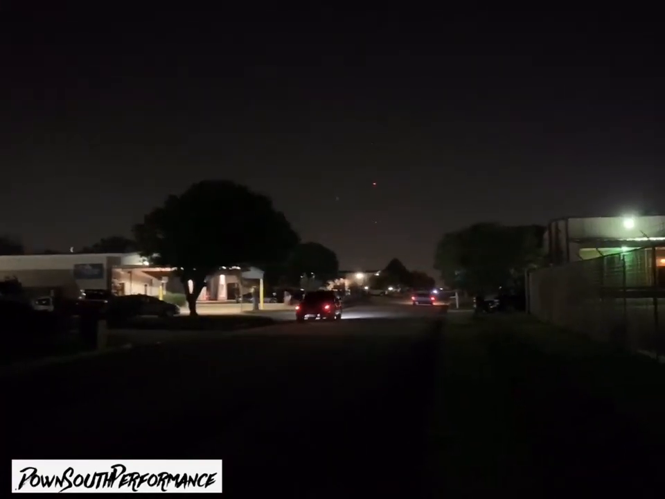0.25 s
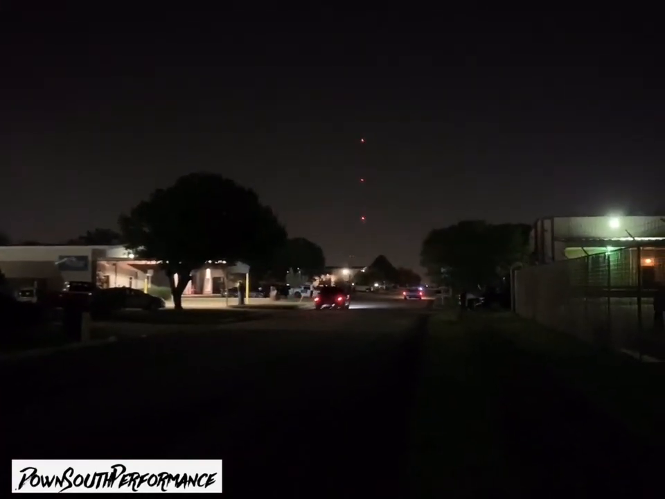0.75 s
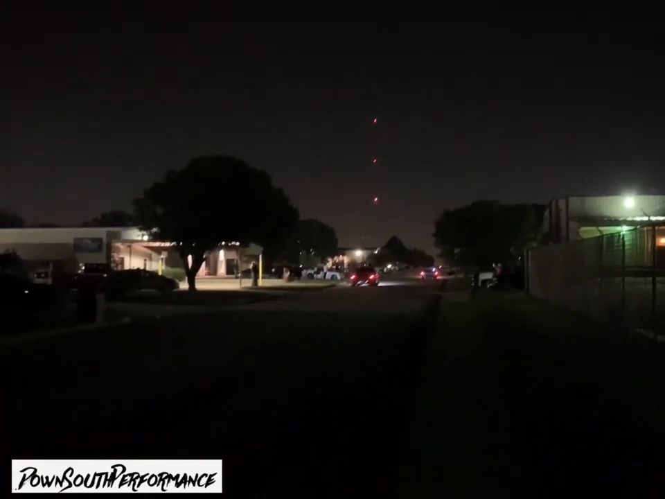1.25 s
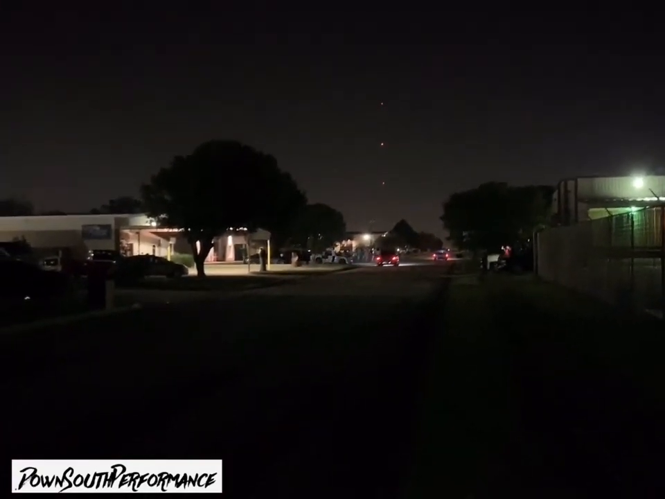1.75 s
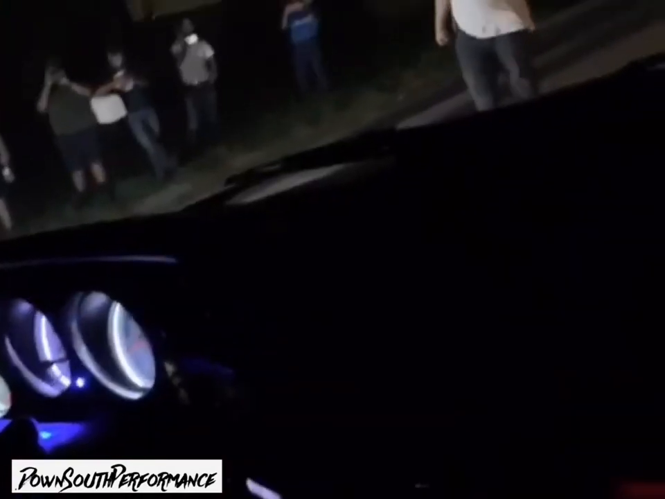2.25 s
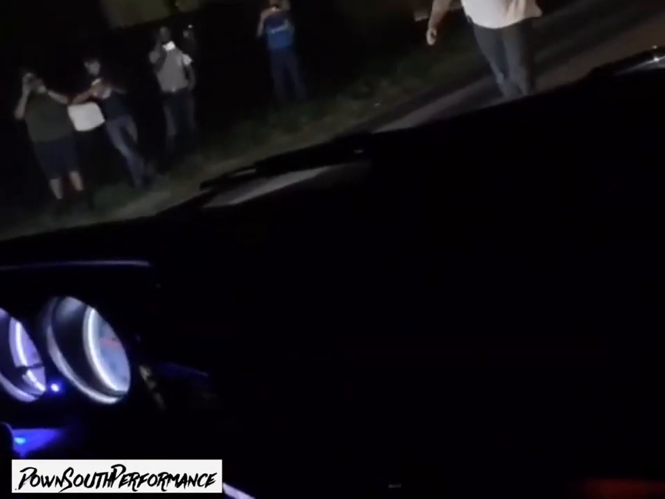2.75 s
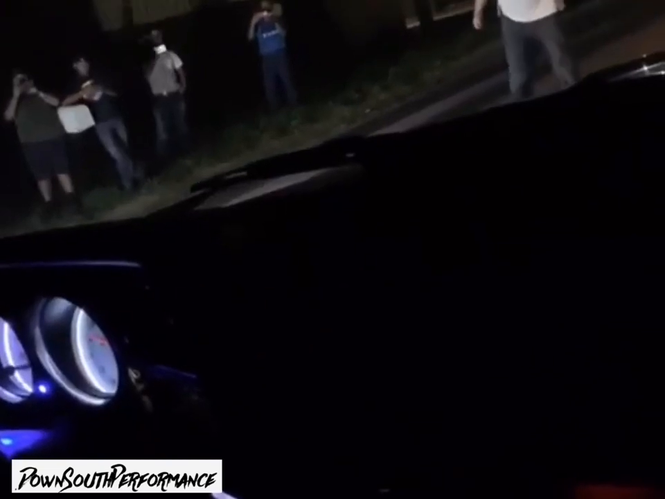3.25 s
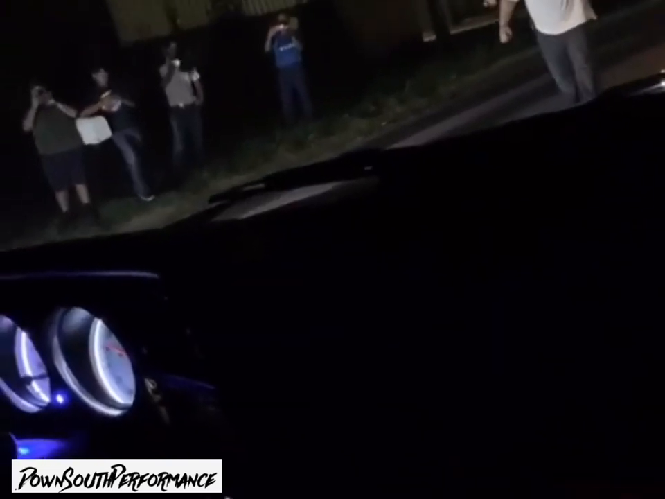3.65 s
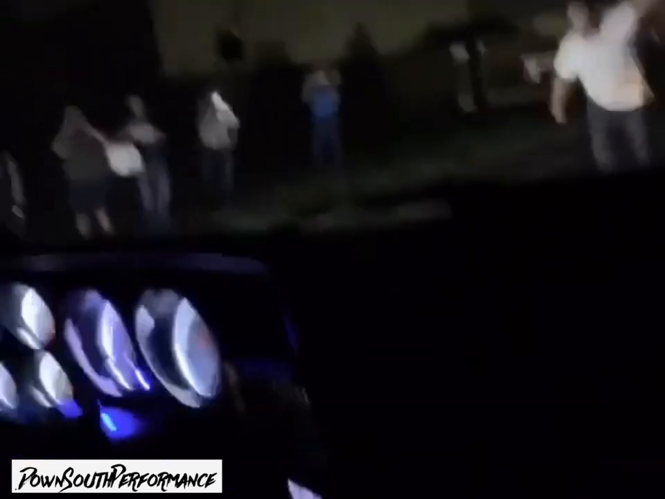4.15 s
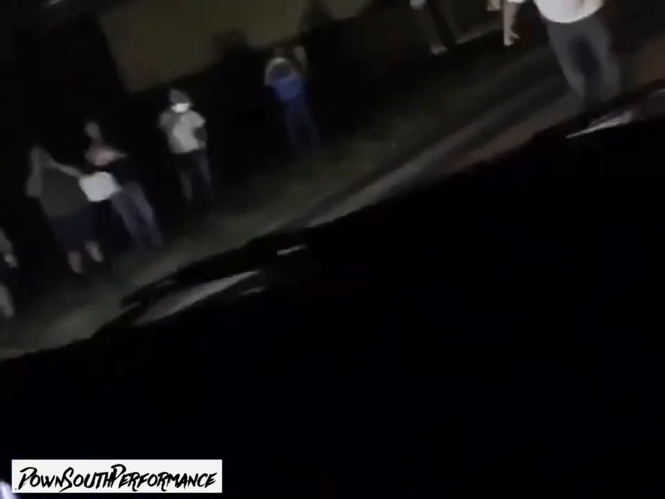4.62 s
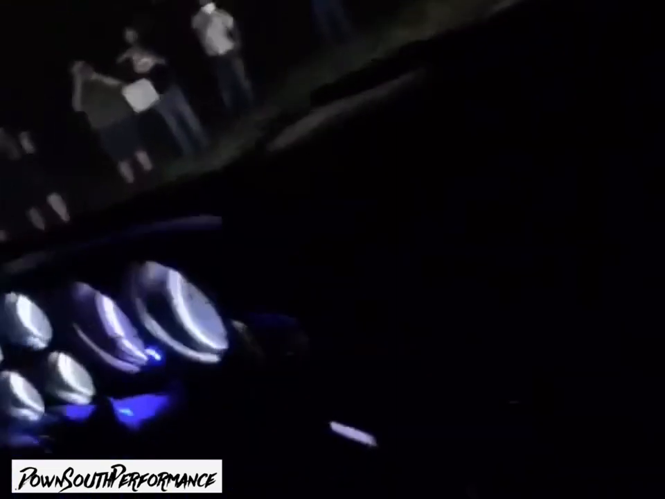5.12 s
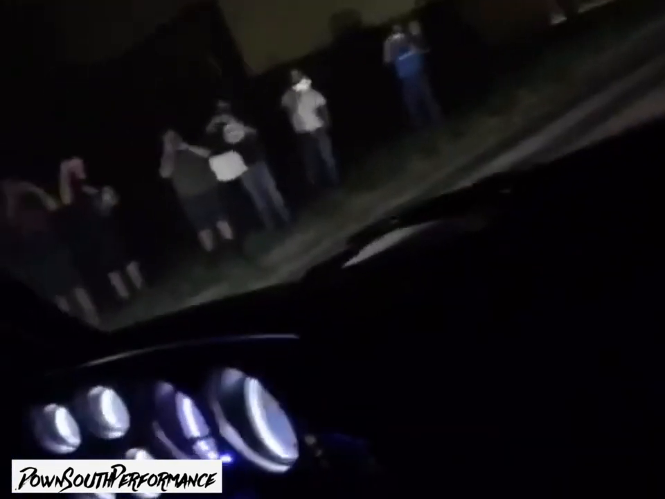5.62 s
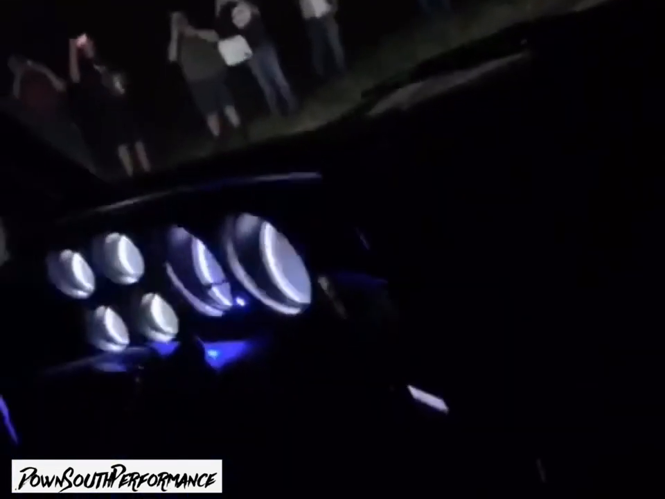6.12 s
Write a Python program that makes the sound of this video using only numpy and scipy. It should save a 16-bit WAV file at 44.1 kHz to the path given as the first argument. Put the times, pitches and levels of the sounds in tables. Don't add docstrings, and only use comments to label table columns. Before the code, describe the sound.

From 0 to 2 seconds, a night street outdoors: two racers accelerate away, slightly left of centre. A steady midrange engine note and a rival's higher one sag after a gear change at about 0.2-0.5 s, then climb slowly, growing a little louder near the end. Airy roar bounces off road and walls, with raspy gusts, low street hum and very faint high insect chirps. Near-silence for about 0.05 s, then a short falling thump at 2.03 s. Inside a cabin, a lumpy eight-cylinder engine surges upward until 2.7 s, booming and nearly overloaded, rises again to 3.2 s and holds, throbbing. It dips around 4.2 s, climbs to its highest near 4.9 s, then settles slightly lower, its roar softening until the end at 6.4 s. Valve clatter and grainy hiss ride throughout; small metallic clinks at 4.43 s and, fainter, 5.55 s.

```python
import sys
import numpy as np
from scipy import signal
from scipy.fft import rfft, irfft, next_fast_len
from scipy.io import wavfile
from scipy.ndimage import uniform_filter1d

SR = 44100
rng = np.random.default_rng(int(sys.argv[2]) if len(sys.argv) > 2 else 0)


def wav_out(sig):
    wavfile.write(sys.argv[1], SR, np.round(np.clip(np.atleast_2d(sig).T, -1, 1) * 32767).astype(np.int16))


def makeup_ratio(level_db):
    decades = np.asarray(level_db, float) / 20
    return 10 ** decades


N = 281358
TIME = np.arange(N) / SR
FAR_END_S, CUT_IN_S = 1.9815, 2.0318
PATTERN_HZ = 21.3

# [f/Hz, level/dB per Hz]
ROAR = [(290, -33), (500, -4.5), (570, -4), (690, -7.5), (766, -3.5), (850, -5), (977, -2.5), (1420, -10.5),
        (2210, -12.5), (2520, -20), (2780, -15), (3000, -24), (4000, -35.5), (5200, -50), (8800, -120)]
# [level before/dB, level after/dB]
SHIFT_DB = [
    (-38, -40.5),
    (-30, -48.5),
    (-29.5, -37),
]


def rms_one(x):
    return x / np.sqrt(np.mean(x ** 2) + 1e-20)


def in_time(rows, t):
    s, *columns = np.transpose(rows)
    return [np.interp(t, s, c) for c in columns]


def at_hz(points, hz):
    point_hz, value = np.transpose(points)
    return np.interp(np.log(hz), np.log(point_hz), value)


def lift_db(modes, hz):
    return sum(db / (1 + (2 * (hz - centre) / width) ** 2) for centre, width, db in modes)


def swept_db(modes, k, cycle_hz):
    return np.repeat(lift_db(modes, k * cycle_hz[::100]), 100)[:len(cycle_hz)]


def bouts(rows, t, fade_db_per_s, floor_db):
    levels = []
    for s, length, *_, db in rows:
        outside_s = np.maximum(np.maximum(s - t, t - s - length), 0)
        levels.append(np.maximum(db - fade_db_per_s * outside_s, floor_db))
    return np.max(levels, axis=0)


def drift(rate, size, swing_db=None):
    r = np.exp(-80 * np.pi * rate / SR)
    slow = signal.lfilter([1], [1, -2 * r, r * r], rng.standard_normal(size // 40 + 2002))
    slow = rms_one(slow[2000:])
    if swing_db is not None:
        slow = makeup_ratio(swing_db * slow)
    return np.interp(np.arange(size) / 40, np.arange(len(slow)), slow)


def coloured(spectrum, size, patchy_db, rate, channels=1):
    # [f/Hz, likeness 0-1]
    likeness = [(60, 0.98), (500, 1), (1000, 1), (2300, 1), (4700, 0.091), (9700, 0.17)]
    hz = np.maximum(np.arange(size // 2 + 1) * SR / size, 1)
    low, high = spectrum[0][0], spectrum[-1][0]
    shape = makeup_ratio(at_hz(spectrum, hz)) * (hz > low) * (hz < high)
    mid, side = rfft(rng.standard_normal((2, size))) * shape
    pair = mid[None]
    if channels == 2:
        alike = np.clip(at_hz(likeness, hz), 0, .999)
        pair = np.sqrt(1 + alike) * mid + np.sqrt(1 - alike) * side * [[1], [-1]]
    third = 3 * np.log2(hz / low)
    together = drift(rate / 3, size, .51 * patchy_db)
    out = 0
    for k in range(int(third[hz < high][-1]) + 2):
        band = irfft(pair * np.clip(1 - abs(third - k), 0, 1), size)
        out = out + band * drift(rate, size, patchy_db)
    return rms_one(together * out)


def order(cycles, k, wobble_db, wobble_rad, rate):
    size = len(cycles)
    phase = 2 * np.pi * (k * cycles + rng.random()) + wobble_rad * drift(rate, size)
    return np.sqrt(2) * drift(rate, size, wobble_db) * np.sin(phase)


def shifted_db(row, t):
    before, after = SHIFT_DB[row]
    return before + (after - before) * np.clip((t - .22) / 0.099, 0, 1)


def street_hum(t):
    # [f/Hz, level/dB per Hz]
    hum_spectrum = [(12, -55), (20, -28), (64, -6.5), (103, -11), (151, -2), (192, -2.5), (363, -7),
                    (412, -8.5), (454, -1), (549, -1.5), (614, -5.5), (698, -40.5), (900, -18.5),
                    (1170, -60), (1980, -120)]
    return makeup_ratio(shifted_db(2, t) + 0.5) * coloured(hum_spectrum, len(t), 0.91, 2.7, channels=2)


def insects(t):
    # [start/s, length/s, level/dB]
    insect_bouts = [
        (0, .05, -52),
        (.39, .01, -60),
        (.73, 0.11, -57),
        (1.05, 0.25, -54),
        (1.38, 0.027, -49),
        (1.55, .11, -53),
    ]
    song = coloured([(7200, -15.5), (8300, -4), (9500, -31.0)], len(t), 5.0, 25.0, channels=2)
    return makeup_ratio(bouts(insect_bouts, t, fade_db_per_s=90, floor_db=-62.5)) * song


def road_echo(x, t):
    dull = signal.sosfilt(signal.butter(2, 3200, fs=SR, output="sos"), x)
    late = t - 0.001913 * (1 + .035 * drift(2.5, len(t)))
    return 0.53 * np.array([np.interp(late, t, channel) for channel in dull])


def distant_roar(t):
    # [t/s, level/dB]
    roar_level = [(0.0, -28), (0.258, -30), (0.34, -35.5), (0.71, -38.5), (0.864, -35), (1.682, -34.5),
                  (1.736, -36.5), (1.93, -33), (1.98, -33.5)]
    # [f/Hz, level/dB per Hz]
    roar_spectrum = [(410, -53), (700, 2.5), (1010, -4), (1120, -6), (1420, -7), (1750, -12.5),
                     (1960, -4.5), (2240, -12.5), (2990, -12), (4180, -25), (10100, -31.5), (13100, -64),
                     (22000, -120)]
    level_db = in_time(roar_level, t)[0]
    roar = coloured(list(roar_spectrum[:-2]) + [(10900, -42)], len(t), 1.6, 5.0, channels=2)
    roar = rms_one(roar + road_echo(roar, t))
    air = coloured([(12400, 0), (15200, -4)], len(t), 1.5, 10.0, channels=2)
    return makeup_ratio(level_db) * roar + makeup_ratio(-66 + .9 * (level_db + 34)) * air


def rasp(t):
    # [start/s, length/s, centre f/Hz, level/dB]
    gusts = [
        (0.194, .04, 1570, -31),
        (0.882, .4, 1453, -37),
        (1.41, .02, 1388, -38),
        (1.598, 0.059, 1382, -34),
        (1.85, 0.083, 1470, -40.5),
    ]
    centre_hz = in_time([(s + length / 2, hz) for s, length, hz, _ in gusts], t)[0]
    level_db = bouts(gusts, t, fade_db_per_s=155, floor_db=-48)
    slow = signal.sosfilt(signal.butter(2, 110, fs=SR, output="sos"), rng.standard_normal((2, len(t))))
    phase = 2 * np.pi * np.cumsum(centre_hz) / SR
    return makeup_ratio(level_db - 0.5) * rms_one(slow[0] * np.cos(phase) + slow[1] * np.sin(phase))


def second_racer(t):
    # [t/s, f/Hz, level/dB]
    rival = [
        (0, 506, -33),
        (.2, 511, -34.5),
        (.364, 442, -36),
        (.46, 415, -38.5),
        (.56, 402, -38.5),
        (1.2, 416.5, -38),
        (1.7, 422.7, -35.5),
        (1.98, 436, -30.5),
    ]
    hz, level_db = in_time(rival, t)
    return makeup_ratio(level_db) * order(np.cumsum(hz) / SR, 1.0, 0.54, 0.083, 7.2)


def first_racer(t):
    # [t/s, speed/cycles per s]
    racer_speed = [(0, 39.1), (.22, 39.1), (.4, 38.2), (.6, 36.6), (.75, 36.75), (1.2, 37.7), (1.65, 38.6),
                   (1.98, 39.25)]
    # [order, level/dB]
    racer_pattern = [(3, 0), (4, -14.5), (5, 3), (6, -1.5), (7, -7), (12, -14), (13, -1), (14, -40),
                     (15, -22.5), (16, 4), (17, -8), (22, -15), (26, -4)]
    cycles = np.cumsum(in_time(racer_speed, t)[0]) / SR
    racer = makeup_ratio(shifted_db(1, t)) * order(cycles, 8, 1.2, .2, 8.0)
    for k, db in racer_pattern:
        racer = racer + makeup_ratio(shifted_db(0, t) - 4.0 + db) * order(cycles, k, 3.0, .4, 6.0)
    return racer


def far_street(t):
    engines = first_racer(t) + rasp(t) + second_racer(t)
    left, right = engines + street_hum(t) + distant_roar(t) + insects(t)
    return np.array([left, np.roll(right, shift=4)]) * makeup_ratio([[.3], [-.3]])


def cut_in(t):
    age = np.maximum(t - CUT_IN_S, 8e-5)
    sweep = np.cos(2 * np.pi * np.log(age / .0024) / np.log(2.4))
    thump = .8 * sweep * np.exp(-(age / .014) ** 2) * np.tanh(age / .0003)
    return signal.sosfilt(signal.cheby2(8, 60, 11500, fs=SR, output="sos"), thump)


def clink(t):
    # [t/s, level/dB]
    touches = [
        (4.431, -30),
        (4.437, -26),
        (4.445, -27.5),
        (4.452, -24.5),
        (5.55, -34.5),
    ]
    # [f/Hz, level/dB, time to fall 60 dB/s]
    ring_modes = [(2098, 2, 0.13), (2425, -4.5, 0.069), (3940, -17, 0.032), (3840, -3, 0.089),
                  (6120, -14, 0.071)]
    out = np.zeros(len(t))
    for s, hit_db in touches:
        on = (t > s) & (t < s + .2)
        age = t[on] - s
        for hz, db, t60 in ring_modes:
            level_db = hit_db + db + 1.9 * rng.standard_normal() - 60 * age / t60
            out[on] += makeup_ratio(level_db) * np.sin(2 * np.pi * hz * age)
    return out


def shaped(x, spectrum, modes):
    hz = np.maximum(np.arange(len(x) // 2 + 1) * SR / len(x), 1)
    return rms_one(irfft(rfft(x) * makeup_ratio(at_hz(spectrum, hz) + lift_db(modes, hz)), len(x)))


def clatter(cycles, change_hz):
    # [f/Hz, width/Hz, lift/dB]
    block = [(806, 24, 5), (963, 35, 5), (1059, 37, 8), (1150, 52, 7), (1365, 73, 5.5), (1590, 210, 2.5)]
    patterns = rng.standard_normal((6, 400)) * makeup_ratio(2.5 * rng.standard_normal(400))
    standing_out = makeup_ratio(4.5 * np.clip(rng.standard_normal((6, 201)), -2, 1.3))
    patterns = irfft(rfft(patterns) * standing_out, 400)
    at = (cycles * 400).astype(int)
    fresh = np.diff(at, prepend=0) > 0
    shares = np.array([drift(change_hz, len(at)) for p in patterns])
    shares = shares / np.sqrt(np.sum(shares ** 2, axis=0))
    return shaped(np.sum(shares * patterns[:, at % 400], axis=0) * fresh, ROAR, block)


def swells(t, cycles):
    # [order, start/s, end/s, level/dB]
    caught_orders = [(19, 2.6, 2.95, -21), (37, 3.15, 4.05, -38), (45, 3.0, 4.05, -36),
                     (54, 3.2, 4.05, -40), (88, 3.15, 3.65, -44), (102, 3.05, 3.85, -42),
                     (132.5, 3.1, 3.9, -48), (14, 4.45, 5.25, -23), (7, 4.55, 5.15, -24),
                     (22, 4.65, 5.15, -35), (44, 4.55, 5.25, -39), (53, 4.65, 5.2, -38),
                     (5, 5.05, 6.6, -25), (19, 2.98, 3.7, -25), (5, 4.5, 5.15, -23), (3, 2.7, 3.2, -27),
                     (52, 2.7, 3.2, -35), (58, 4.45, 5.1, -41), (63, 4.45, 5.1, -42), (24, 5.05, 6.6, -35),
                     (40, 5.15, 6.6, -43), (61, 5.1, 5.7, -43), (72, 5.2, 5.8, -44), (47, 5.15, 6.0, -42),
                     (55, 5.2, 6.0, -43), (14, 5.3, 6.6, -33)]
    out = np.zeros(len(t))
    for k, start, end, db in caught_orders:
        on = (t > start) & (t < end)
        window = np.clip(np.minimum(t[on] - start, end - t[on]) / .12, 0, 1)
        out[on] += makeup_ratio(db) * window * order(cycles[on], k, 1.0, 0.25, 5.3)
    return out


def strong_orders(t, cycle_hz, load_db):
    # [order, level at mean load off resonance/dB, share of the load's swing]
    strongest = [
        (8, -28.5, 0.089),
        (6, -23.5, .4),
        (16, -32.5, 0.45),
        (2, -30, 0.22),
    ]
    # [f/Hz, width/Hz, lift/dB]
    boom_modes = [(38, 9.6, 13.5), (125.5, 20.8, 12.5), (183.7, 9, 12.5), (345.6, 17.7, 13.5)]
    own = {}
    for k, db, share in strongest:
        own[round(k)] = db + share * load_db + swept_db(boom_modes, round(k), cycle_hz)
    pull = np.clip((2.62 + 0.28 - t) / 0.28, 0, 1)
    boom_db = pull * swept_db(boom_modes, 8, cycle_hz)
    own[8] = own[8] + 19.5 * pull - 0.57 * boom_db
    own[2] = own[2] - 7.5 * pull
    own[6] = own[6] - 7.5 / 2 * pull
    own[16] = own[16] + bouts([(4.25, 0.39, 3.5)], t, fade_db_per_s=61, floor_db=0)
    return own, boom_db


def engine_tone(t, cycles, cycle_hz, load_db, own, boom_db):
    # [order, level/dB]
    pattern = [(1, -29), (2, -12), (3, -20), (4, -20.5), (5, -13), (6, 0), (7, -20), (8, -15), (9, -16.5),
               (10, -9.5), (11, -19), (12, -40.5), (13, -20.5), (14, -22), (15, -16.5), (16, -8), (17, -21),
               (18, -35), (19, -16.5), (20, -14.5), (21, -26.5), (22, -31), (23, -28.5), (24, -26),
               (25, -34.5), (26, -34.5), (27, -55), (28, -29.5)]
    # [f/Hz, width/Hz, lift/dB]
    cabin_modes = [(42, 54, 15.5), (123, 70, 17.5), (200.8, 37, 15.5), (312.5, 48, 8.5), (415, 39, 16.5),
                   (532, 90, 9.5)]
    tone = swells(t, cycles)
    weak_db = -18 + load_db - .4 * boom_db
    for k, db in pattern:
        if k in own:
            tone = tone + makeup_ratio(own[k]) * order(cycles, k, 1.2, .2, 9.0)
        else:
            lift = swept_db(cabin_modes, k, cycle_hz) - lift_db(cabin_modes, k * PATTERN_HZ)
            tone = tone + makeup_ratio(weak_db + 4.5 + db + lift) * order(cycles, k, 2.5, .4, 6.0)
    return tone


def engine_rumble(t, load_db, boom_db):
    # [f/Hz, level/dB per Hz]
    rumble_spectrum = [(12, -34.5), (20, -8.5), (75, -3.5), (112, -17.5), (136, 3), (195, -7.5),
                       (258, -8.5), (343, -14.5), (428, -11), (468, -19), (528, -24), (603, -32),
                       (700, -20), (910, -64.5), (1540, -120)]
    level_db = -19.5 + 0.33 * load_db - 0.8 * boom_db
    return makeup_ratio(level_db) * coloured(rumble_spectrum, len(t), 2.7, 16.0)[0]


def engine_roar(t, cycles, cycle_hz, load_db, puff):
    roar = rms_one((1.1 + puff) * coloured(ROAR, len(t), 2.2, 17.0)[0])
    roar = rms_one(roar + 1.4 * (cycle_hz / PATTERN_HZ) ** 2 * clatter(cycles, .9))
    return makeup_ratio(-26.5 + load_db) * roar


def engine_hiss(t, load_db, puff):
    # [f/Hz, level/dB per Hz]
    hiss_spectrum = [(1760, -14), (3000, -2), (3850, -3.5), (4120, -4.5), (5000, -6.5), (8560, -6.5),
                     (9000, -8), (11700, -42), (19800, -120)]
    return makeup_ratio(-41 + load_db) * rms_one((9.9 + puff) * coloured(hiss_spectrum, len(t), 1.0, 30.0)[0])


def near_engine(t):
    # [t/s, speed/cycles per s]
    speed = [(2.04, 8.7), (2.5, 15.65), (2.68, 18.28), (2.81, 18.24), (2.95, 18.9), (3.06, 20.4),
             (3.24, 21.4), (3.65, 21.35), (3.9, 21.15), (4.06, 21.32), (4.18, 19.94), (4.3, 20.16),
             (4.52, 21.9), (4.7, 22.7), (4.86, 23.09), (5.05, 22.93), (5.28, 22.3), (6.38, 22.17)]
    # [t/s, level/dB]
    load = [(2.04, -10.5), (2.055, -31), (2.08, -25), (2.29, -22.5), (2.33, -24), (2.5, -28), (2.55, -22),
            (2.97, -22.5), (3.9, -26), (4.12, -28.5), (4.4, -29), (4.5, -28), (5.03, -31), (5.15, -31.5),
            (5.95, -33), (6.38, -32.5)]
    cycle_hz = in_time(speed, t)[0]
    load_db = in_time(load, t)[0] + 27
    cycles = np.cumsum(cycle_hz) / SR
    own, boom_db = strong_orders(t, cycle_hz, load_db)
    puff = np.exp(-3.0 * (8 * cycles % 1)) * makeup_ratio(0.7 * np.sin(4 * np.pi * cycles))
    tone = engine_tone(t, cycles, cycle_hz, load_db, own, boom_db)
    roar = engine_roar(t, cycles, cycle_hz, load_db, puff)
    return tone + engine_rumble(t, load_db, boom_db) + roar + engine_hiss(t, load_db, puff)


def grainy_treble(x, keep_db, step):
    hz, _, bins = signal.stft(x, SR, "cosine", nperseg=2048, noverlap=1024)
    bands = abs(bins[:1024]).reshape(128, 8, -1)
    level = np.sqrt(np.mean(bands ** 2, axis=1, keepdims=True)) + 1e-9
    mask = makeup_ratio(-4.3) * np.exp(uniform_filter1d(np.log(level), size=9, axis=2))
    mask[19:38] *= np.where(level[19:38] < makeup_ratio(keep_db + 10), makeup_ratio(1.7), 1)
    kept = level > np.maximum(makeup_ratio(keep_db), mask)
    coarse = np.round(bands / level / step) * step * level * kept
    gain = coarse.reshape(1024, -1) / (abs(bins[:1024]) + 1e-12)
    bins[:1024] *= np.where(hz[:1024, None] > 1300, gain, 1)
    top_hz = 9250 + 250 * uniform_filter1d(rng.standard_normal(bins.shape[1]), size=4)
    bins = bins * (hz[:, None] < top_hz)
    return signal.istft(bins, SR, "cosine", nperseg=2048, noverlap=1024)[1][:len(x)]


def scene():
    out = np.zeros((2, N))
    far, near = TIME < FAR_END_S, TIME >= CUT_IN_S
    out[:, far] = far_street(TIME[:next_fast_len(far.sum())])[:, :far.sum()]
    t = CUT_IN_S + np.arange(next_fast_len(near.sum())) / SR
    loud = near_engine(t) + clink(t)
    squeezed = loud / (1 + abs(loud / 1.08) ** 5) ** (1 / 5)
    fade = np.clip((t - CUT_IN_S) / 0.028, 0, 1)
    cabin = fade * grainy_treble(squeezed, keep_db=-78.5, step=1.5) + cut_in(t)
    out[:, near] = cabin[:near.sum()]
    return out


def top_cut(x):
    return signal.sosfilt(signal.butter(12, 15870, fs=SR, output="sos"), x)


def record(dry):
    mix = np.clip(dry, -1, 1)
    return top_cut(mix)


dry = scene()
out = record(dry)
wav_out(out)
```